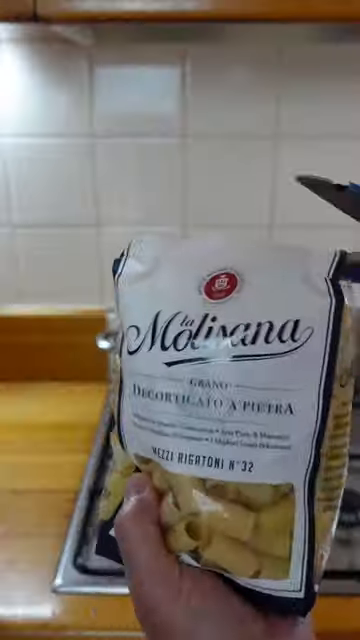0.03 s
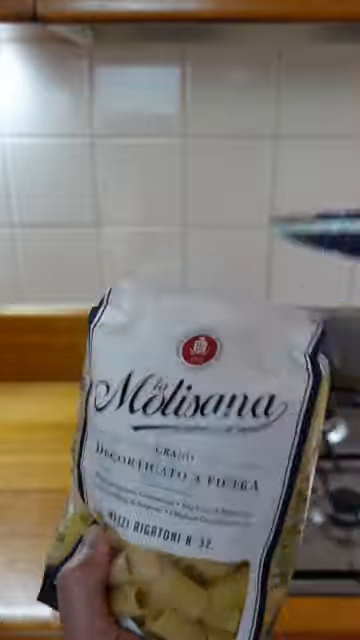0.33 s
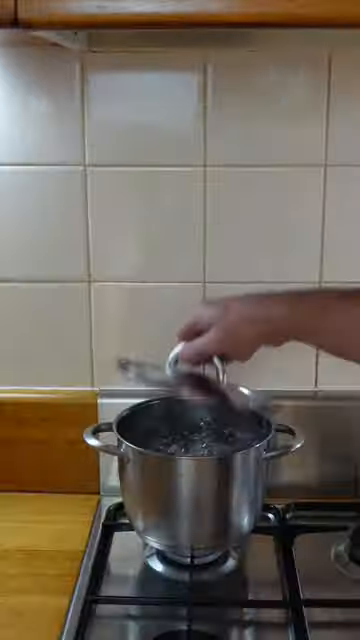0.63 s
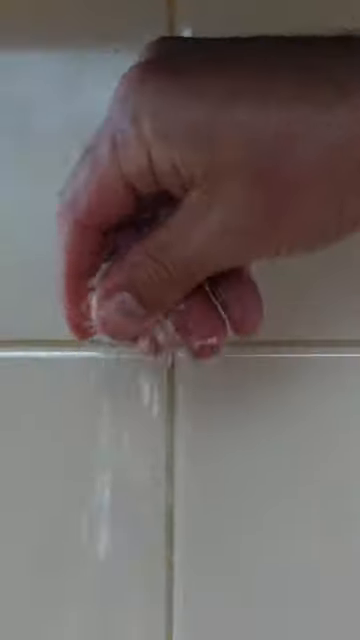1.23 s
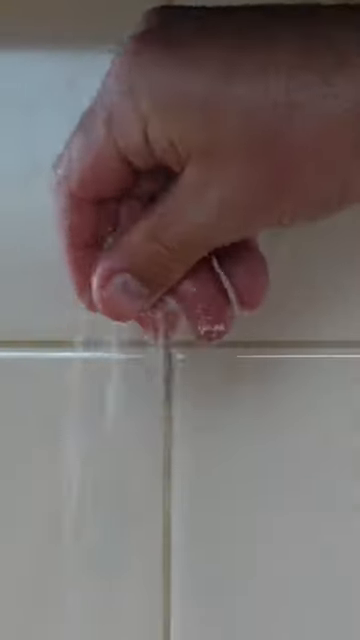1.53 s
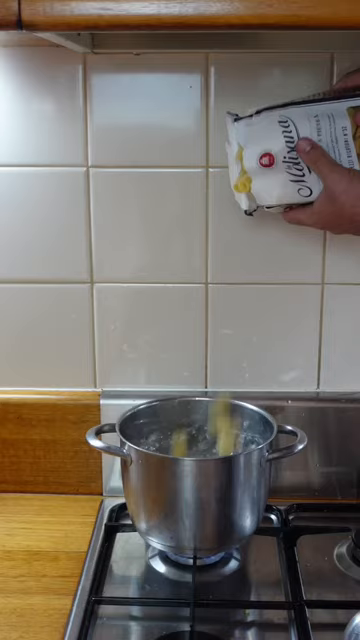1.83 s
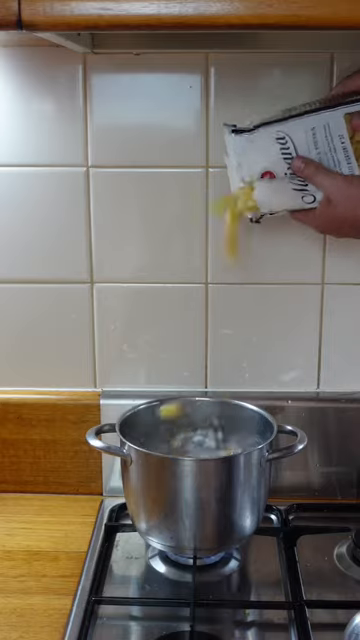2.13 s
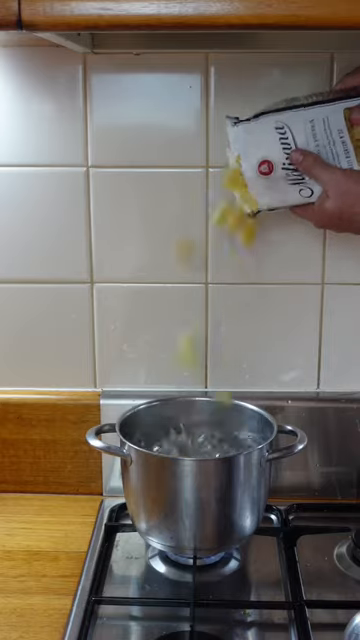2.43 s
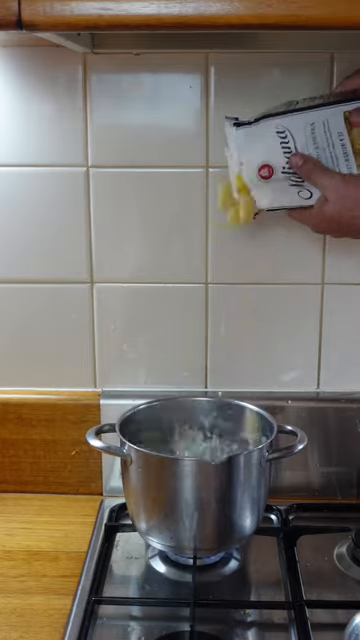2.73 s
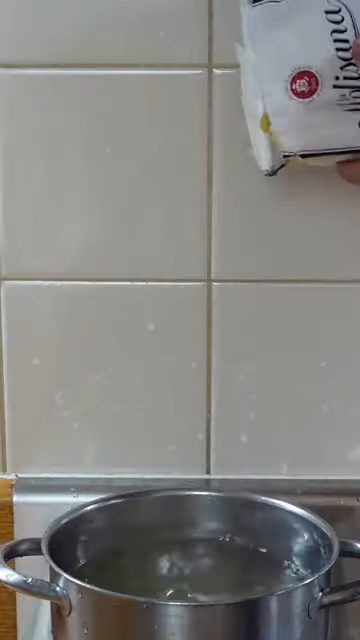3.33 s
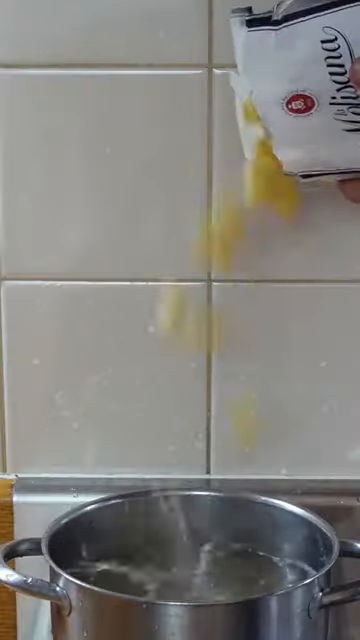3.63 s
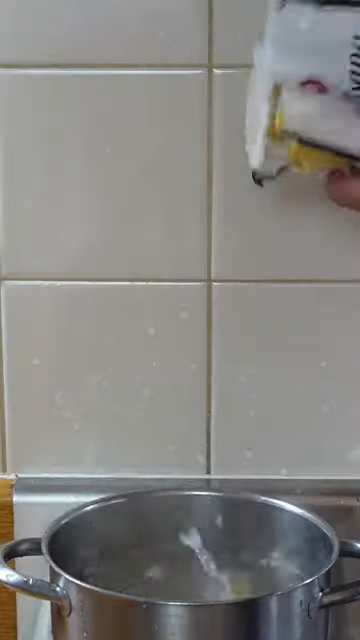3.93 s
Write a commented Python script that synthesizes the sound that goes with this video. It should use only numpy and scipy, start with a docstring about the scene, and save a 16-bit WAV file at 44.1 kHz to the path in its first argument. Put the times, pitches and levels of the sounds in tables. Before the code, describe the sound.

Dry pasta pours into simmering water after a scissor snip and a clattering pot lid.

```python
"""Scissors crunch through a plastic bag, close to a mono microphone in a small tiled kitchen.
A steel lid knocks off a simmering pot, rings in the hand and clatters down; salt hisses on the water.
Then dry pasta tubes click out of the rustling bag and splash in, while big bubbles stir the
hollow note of the pot. The tiles add a short, bright echo."""
import sys
import numpy as np
from scipy import signal
from scipy.io import wavfile
from scipy.ndimage import uniform_filter1d

SR = 44100
rng = np.random.default_rng(int(sys.argv[2]) if len(sys.argv) > 2 else 0)


def waveform_to_disk(signal):
    """Save audio, clipped to [-1, 1], as 16-bit WAV at the path in sys.argv[1]."""
    frames = np.transpose(np.atleast_2d(signal))
    scaled = np.clip(frames, -1, 1) * 32767
    samples = np.round(scaled).astype(np.int16)
    wavfile.write(sys.argv[1], SR, samples)


N = 176400
TIME = np.arange(N) / SR
LID_STOP_S, POUR_START_S = 1.161, 1.869

# modes of the steel lid: pitch_hz
LID_MODE_HZ = [1922, 2038, 2126, 2182, 2236, 2433, 2684, 2928, 3224, 3606, 3842, 4030, 4214, 4551, 5050,
               5838, 7164, 7383, 7775, 8830, 9750]
# strength and decay of each mode: lifted_db, dropped_db, lifted_t60_s
LID_MODES = [(-46, -16, 0.13), (-27.5, -29, 0.39), (-39, -16.5, 0.17), (-44, -31, 0.45), (-34, -24, 0.46),
             (-36.5, -43, 0.94), (-43.5, -25.5, 1.4), (-41.5, -35.5, 3.6), (-41.5, -47, 1.5),
             (-46.5, -28.5, 1.5), (-58, -28, 0.34), (-51, -32, 1.1), (-63, -29, 0.43), (-48, -22.5, 1.04),
             (-40, -43, 0.47), (-41.5, -27.5, 0.7), (-49, -29, 0.57), (-53.5, -36, 0.45), (-53, -33, 0.55),
             (-53, -31, .5), (-49, -31, .25)]
# tubes plunge into the water: peak_s, level_db, fall_s, bubble_hz
PLUNGES = [(1.92, -24, .03, 1604), (2.001, -26, 0.031, 2370), (2.038, -23.5, 0.0073, 1680),
           (2.054, -23.5, 0.026, 2170), (2.11, -22, 0.032, 1805), (2.203, -26.5, .03, 2090),
           (2.292, -28, 0.021, 843), (2.457, -30, 0.023, 1590), (2.585, -25, 0.021, 1950),
           (2.679, -24, 0.01, 1636), (2.715, -25, 0.041, 593), (2.885, -26, 0.019, 508),
           (3.021, -21.5, 0.029, 621), (3.272, -25.5, 0.027, 1734), (3.36, -20.5, .016, 693),
           (3.45, -24, 0.022, 1720), (3.517, -20, 0.015, 710), (3.541, -25.5, 0.028, 3500),
           (3.582, -28.5, .03, 2210), (3.747, -20, 0.012, 1806), (3.782, -25, 0.024, 2680),
           (3.921, -25, 0.025, 1085)]
RISE_SHARE = .45  # a splash's rise time over its fall_s


def amp(db):
    """Decibels to gain."""
    return 10 ** (np.asarray(db) / 20)


def unit(x):
    """Scales to rms 1."""
    return x / np.sqrt(np.mean(x ** 2) + 1e-20)


def read(points, hz):
    """Reads a table on a log-frequency axis."""
    freqs, values = np.transpose(points)
    return np.interp(np.log(hz + 1), np.log(freqs + 1), values)


def add(mix, start_s, sound):
    """Mixes a sound in at start_s."""
    part = mix[round(start_s * SR):][:len(sound)]
    part += sound[:len(part)]


def colour(x, spectrum, size=4096):
    """Causal filter of unit energy with the given spectral shape."""
    log_gain = np.log(amp(read(spectrum, abs(np.fft.fftfreq(size, 1 / SR)))))
    response = np.exp(np.conj(signal.hilbert(log_gain)))  # minimum phase
    taps = np.fft.ifft(response).real[:size // 2]
    return signal.oaconvolve(x, taps / np.linalg.norm(taps))[:N]


def crackle(per_s, spread_db):
    """A dense train of tiny clicks of uneven size."""
    ticks = rng.standard_normal(N) * (rng.random(N) < per_s / SR)
    return unit(ticks * amp(spread_db * np.minimum(rng.exponential(1, N), 4)))


def swells(rows):
    """Envelope of bursts that rise to a peak and fall away."""
    power = sum(amp(db) ** 2 * np.exp(-2 * np.maximum((s - TIME) / rise, (TIME - s) / fall))
                for s, db, rise, fall in rows)
    return np.sqrt(power)


def bursts(rows, fall_s):
    """Each blow is a sharp burst of noise that dies quickly."""
    out, t = np.zeros(N), TIME[:SR // 4]
    envelope = (1 - np.exp(-10 * t / fall_s)) * np.exp(-t / fall_s)
    for s, db in rows:
        add(out, s, amp(db) * envelope * rng.standard_normal(len(t)))
    return out


def ring(rows, modes):
    """Modes gain energy with every blow and lose it at their own rates."""
    blows, out, start_s = np.zeros(3 * SR // 2), np.zeros(N), rows[0][0]
    for s, db in rows:
        add(blows, s - start_s, amp([db]) ** 2)
    for hz, db, t60 in modes:
        energy = signal.lfilter([1], [1, -amp(-60 / t60 / SR) ** 2], blows + 1e-20)
        tone = np.sin(2 * np.pi * (hz * TIME[:len(blows)] + rng.random()))
        add(out, start_s, amp(db) * np.sqrt(energy) * tone)
    return out


def kitchen(x, wet_db):
    """Tiled walls return a short, bright echo to the microphone."""
    # decay of the room: freq_hz, t60_s
    decay = [(150, 0.25), (4000, 0.46), (14000, 0.34)]
    size = SR // 2
    echoes = rng.standard_normal(size) * (rng.random(size) < .12) * (TIME[:size] > .003)
    hz, t, spectrum = signal.stft(echoes, SR, nperseg=256)
    tail = signal.istft(spectrum * amp(-60 * t / read(decay, hz)[:, None]), SR, nperseg=256)[1]
    return x + amp(wet_db) * signal.oaconvolve(x, tail / np.linalg.norm(tail))[:N]


def pot(hollow_hz=338.5, width_hz=6.3):
    """Water simmers; big bubbles sound the air in the pot, wavering as the water heaves."""
    # colour of the simmer: freq_hz, level_db
    simmer_colour = [(25, -20.5), (156, -7.5), (260, -11.5), (804, -12.5), (1240, -19), (1850, -12.5),
                     (2170, -22), (3830, -20.5), (15500, -40)]
    # course of the simmer: time_s, level_db
    simmer_levels = [(.55, -50.5), (1.03, -50), (1.2, -46.5), (1.85, -48)]
    # big bubbles: peak_s, level_db
    big_bubbles = [(1.071, -21.5), (1.361, -39), (1.72, -40), (2.09, -29.5), (2.321, -27), (2.57, -32),
                   (2.691, -29.5), (2.734, -24.5), (3.44, -33.5), (3.77, -31.5), (3.944, -28)]
    simmer = colour(rng.standard_normal(N), simmer_colour)
    pole = np.exp((-np.pi * width_hz + 2j * np.pi * hollow_hz) / SR)
    hollow = unit(signal.lfilter([1], [1, -pole], rng.standard_normal(N)).real)
    waver = unit(uniform_filter1d(rng.standard_normal(N), size=300))
    note = np.sin(2 * np.pi * np.cumsum(hollow_hz * (1 + 0.044 * waver)) / SR)
    gulps = swells([(s, db, .015, .03) for s, db in big_bubbles]) * note
    level = amp(np.interp(TIME, *np.transpose(simmer_levels)))
    return level * (simmer + amp(-11) * hollow) + gulps


def salt():
    """Fine grains hiss on the water."""
    # pinches of salt: peak_s, level_db, rise_s, fall_s
    pinches = [(1.35, -50, 0.071, 0.097), (1.59, -47.5, 0.054, 0.048)]
    # colour of the hiss: freq_hz, level_db
    hiss_colour = [(300, -53), (1500, -13), (3300, 6.5), (6000, -6), (15000, -24)]
    return colour(swells(pinches) * rng.standard_normal(N), hiss_colour)


def rasp(level):
    """The dense, bright crinkle of plastic film."""
    treble = signal.butter(2, [6800, 14000], "band", fs=SR)
    return signal.lfilter(*treble, level * crackle(per_s=9000, spread_db=4))


def bag():
    """Folds of the bag buckle in short bursts."""
    # buckling folds: peak_s, level_db
    folds = [(0.012, -37), (.121, -33.5), (.2, -27), (1.954, -35), (2.988, -34.5), (3.541, -29)]
    return rasp(swells([(s, db, .002, .013) for s, db in folds]))


def scissors():
    """Close by, blades crunch through plastic film, which rasps and now and then snaps."""
    # strokes of the blades: peak_s, level_db, rise_s, fall_s
    strokes = [(.018, -31, 0.014, 0.028), (.091, -27, 0.0092, 0.011), (.145, -24, 0.021, 0.016),
               (.207, -19, 0.023, 0.026), (.283, -18.5, 0.014, 0.021), (.357, -20.5, 0.025, 0.029)]
    # the film snaps: start_s, level_db
    snaps = [(.0105, -23.5), (.034, -17), (.1195, -16), (.2225, -18), (.3452, -10)]
    # colour of the crunch: freq_hz, level_db
    film_colour = [(60, -53), (130, -28), (220, -3.5), (450, 0), (3800, 1), (6000, -3), (10000, -19.5),
                   (15500, -30)]
    cutting = swells(strokes)
    crunch = cutting * crackle(per_s=14000, spread_db=1.5) + bursts(snaps, fall_s=0.0028)
    return kitchen(colour(crunch, film_colour) + rasp(amp(-17.5) * cutting), wet_db=-16.5)


def lid_lifted(turn_s=0.814, turn_width_s=0.021, beam_hz=3040, beam_octaves=0.36):
    """The lid knocks and clinks off the rim, the hob thuds, and the lid beats as it turns in the hand."""
    # the lid scrapes off the rim: start_s, level_db
    blows = [(.609, -9.5), (.627, -0.5), (.633, -1.5)]
    # colour of the knocks: freq_hz, level_db
    knock_colour = [(29, -48), (50, -17), (354, -8.5), (856, -16), (1350, -13), (1970, -5.5), (2760, -15),
                    (4660, -16), (15000, -36.5)]
    # thud of the pot on the hob: pitch_hz, level_db, t60_s
    hob_modes = [(73.7, -44, 0.52), (152, -27, 0.08)]
    # the rim clinks: start_s, pitch_hz, level_db
    rim_clinks = [(.609, 4740, -30), (.662, 4540, -27)]
    knocks = amp(-18.5) * colour(bursts(blows, fall_s=0.014), knock_colour)
    # the lid's face swings past the microphone, beaming the modes near beam_hz
    facing = (amp(7) - 1) * np.exp(-((TIME - turn_s) / turn_width_s) ** 2)
    tones = np.zeros(N)
    for hz, (db, _, t60) in zip(LID_MODE_HZ, LID_MODES):
        beam = 1 + facing * np.exp(-(np.log2(hz / beam_hz) / beam_octaves) ** 2)
        beat_hz = 2.39 * rng.uniform(0.56, 2)
        beat = 1 + .25 * np.sin(2 * np.pi * (beat_hz * TIME + rng.random()))
        tones += beam * beat * ring(blows, [(hz, db, t60)])
    tones *= amp(-2) * (TIME < LID_STOP_S)
    clinks = sum(ring([(s, db)], [(hz, 0, .12)]) for s, hz, db in rim_clinks)
    return kitchen(knocks, wet_db=-7) + tones + ring(blows, hob_modes) + clinks


def lid_dropped(high_modes=30):
    """The lid bounces on a hard surface, the hardest blows waking high modes; the sound stops dead."""
    # bounces: start_s, body_db, crack_db
    bounces = [(1.0326, 1.5, -16), (1.046, -2.5, -28), (1.053, -1, -33), (1.063, -0.5, -45),
               (1.071, -0.5, -25), (1.1257, 1.5, -25), (1.133, -4.5, -15.5), (1.140, -2.5, -18.5),
               (1.155, -1, -19.5)]
    # colour of the lid's body: freq_hz, level_db
    body_colour = [(80, -25), (250, -14), (700, -16), (1100, -6), (1500, -10.5), (2000, -1.5),
                   (2900, -15.5), (4500, -8), (8500, -21.5), (15500, -64)]
    # colour of the sharp contact: freq_hz, level_db
    crack_colour = [(200, -14), (2000, 2), (4000, -8), (9500, -7), (15500, -18.5)]
    blows = [(s, db) for s, db, _ in bounces]
    cracks = [(s, db) for s, _, db in bounces]
    knocks = amp(-13) * colour(bursts(blows, fall_s=0.0091), body_colour)
    knocks += colour(bursts(cracks, fall_s=0.004), crack_colour)
    damped_modes = [(hz, db, t60 * 0.38) for hz, (_, db, t60) in zip(LID_MODE_HZ, LID_MODES)]
    tones = amp(-1) * ring(blows, damped_modes)
    high_hz = 5000 + 10500 * (np.arange(high_modes) + rng.random(high_modes)) / high_modes
    high_db = read(crack_colour, high_hz) - 8 + 2 * rng.standard_normal(high_modes)
    high_t60_s = 0.091 * high_hz[0] / high_hz
    shimmer = ring(cracks, zip(high_hz, high_db, high_t60_s))
    gate = np.clip((LID_STOP_S - TIME) / 0.0041 + .5, 0, 1)
    return (kitchen(knocks, wet_db=-1) + tones + shimmer) * gate


def spatter(drive, per_s=900, low_hz=1593, high_hz=7050, pitches=30, decay_cycles=11.2):
    """Droplets and small tube ticks, each with a brief pitch of its own; high ones are weaker."""
    out, t = np.zeros(N), TIME[:SR // 25]
    for hz in np.geomspace(low_hz, high_hz, pitches):
        drops = (rng.random(N) < per_s / pitches / SR) * rng.standard_normal(N) * drive
        blip = np.exp(-hz * t / decay_cycles) * (1 - np.exp(-hz * t)) * np.sin(2 * np.pi * hz * t)
        out += signal.oaconvolve(drops, blip)[:N] / np.hypot(1, 2 * hz / high_hz)
    return out


def bubble(hz, decay_cycles=5.48, glide=0.058):
    """A bubble rings with a short rising note; low ones are weaker."""
    cycles = hz * TIME[:SR // 12]
    age = cycles / decay_cycles
    envelope = hz / 1000 * np.exp(-age) * (1 - np.exp(-cycles)) ** 2
    return envelope * np.sin(2 * np.pi * cycles * (1 + glide * np.tanh(age / 2)))


def splashes(cluster=10, pitch_spread=0.1854):
    """Each plunge throws spray, one clear plop (strongest when it is brief) and lesser bubbles."""
    # colour of the spray: freq_hz, level_db
    spray_colour = [(80, -32), (190, -3), (335, 0.5), (1710, -2), (3900, -1.5), (4720, -6.5), (9340, -16),
                    (15500, -36.5)]
    spray = swells([(s, db, RISE_SHARE * fall, fall) for s, db, fall, _ in PLUNGES])
    spray *= crackle(per_s=7000, spread_db=0)
    bubbles = np.zeros(N)
    for s, db, fall, pitch_hz in PLUNGES:
        plop = amp(db + 13.5) * np.exp(-fall / .013) * bubble(pitch_hz)
        add(bubbles, s, plop)
        for delay, detune in zip(rng.exponential(fall, cluster), rng.standard_normal(cluster)):
            gain = amp(db + 1) * np.exp(-delay / fall / 2)
            note = bubble(pitch_hz * np.exp(pitch_spread * detune))
            add(bubbles, s + delay - RISE_SHARE * fall / 2, gain * note)
    return kitchen(amp(-0.5) * colour(spray, spray_colour) + bubbles, wet_db=-25.5)


def sliding(pouring, crinkles_per_s=90):
    """Dry tubes slide over the crinkling film of the bag."""
    # colour of the rustle: freq_hz, level_db
    rustle_colour = [(47, -50), (80, -12), (263, -3), (343, 6), (418, -0.5), (649, 2.5), (1710, -5),
                     (2660, -6.5), (3950, -4), (9340, -20.5), (15500, -38)]
    buckles = (rng.random(N) < crinkles_per_s / SR) * rng.random(N) ** 2
    energy = signal.oaconvolve(buckles, np.exp(-TIME[:SR // 20] / 0.0049))[:N]
    friction = crackle(per_s=6000, spread_db=0.5)
    crinkles = amp(-3) * unit(np.sqrt(abs(energy)) * rng.standard_normal(N))
    return colour(pouring * (friction + crinkles), rustle_colour)


def pasta():
    """Tubes slide out, click and spatter the water; a few strike the steel pot, which pings unevenly."""
    # tube against tube: start_s, level_db, treble_db_per_octave
    contacts = [(1.916, -19.5, -5), (2.109, -15.5, 7), (2.189, -16.5, -0.5), (2.2886, -10.5, -0.5),
                (2.4513, -23, -2), (2.651, -19.5, 4), (2.8304, -18.5, 2), (3.0326, -16.5, -0.5),
                (3.2337, -20.5, -2.5), (3.406, -13.5, -8), (3.515, -11.5, -1.5), (3.734, -15, -7),
                (3.964, -18.5, -14.5)]
    # tube against the pot: start_s, level_db, treble_db_per_octave
    hard_hits = [(2.1127, -11, 3), (2.529, -10.5, -1), (3.1094, -13.5, -4)]
    # colour of a click: freq_hz, level_db
    click_colour = [(60, -25), (200, -17), (1000, -2), (2100, 0), (4200, 5.5), (6500, -2), (15500, -18)]
    # faint, very high ping as pasta strikes the steel pot: pitch_hz, level_db, t60_s
    ping_modes = [(9020, -17, 0.07), (11180, -26, 0.16), (12550, -22, 0.14), (14100, -31, .12)]
    pouring = (TIME > POUR_START_S) * amp(-36.5)
    rustle = sliding(pouring)
    clicks, pings = np.zeros(N), np.zeros(N)
    for s, db, tilt in contacts + hard_hits:
        tilted = [(hz, level + tilt * max(np.log2(hz / 4000), 0)) for hz, level in click_colour]
        clicks += colour(bursts([(s, db)], fall_s=0.005), tilted)
    slow_noise = uniform_filter1d(uniform_filter1d(rng.standard_normal(N), size=150), size=150)
    flutter = unit(1 + unit(slow_noise))
    for s, db, _ in hard_hits:
        modes = [(hz, level + 2 * rng.standard_normal(), t60) for hz, level, t60 in ping_modes]
        pings += flutter * ring([(s, db)], modes)
    splashing = swells([(s, db, RISE_SHARE * fall, 2 * fall) for s, db, fall, _ in PLUNGES])
    droplets = spatter(.5 * (pouring + splashing))
    return kitchen(rustle + clicks + droplets, wet_db=-10) + pings


def scene():
    """All sources reach one microphone, which feeds both channels."""
    mono = scissors() + bag() + lid_lifted() + lid_dropped() + salt() + pasta() + splashes() + pot()
    return np.array([mono, mono])


def record(dry, edge_hz=15850):
    """Clips at full scale, then removes the highest treble."""
    lowpass = signal.firwin(511, edge_hz, window=("kaiser", 9), fs=SR)
    return signal.oaconvolve(np.clip(dry, -1, 1), lowpass[None], "same")


dry = scene()
out = record(dry)
waveform_to_disk(out)
```